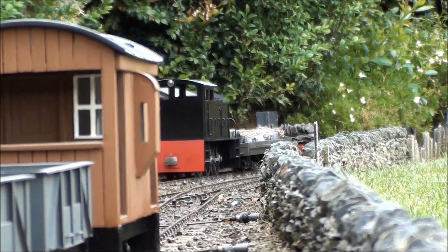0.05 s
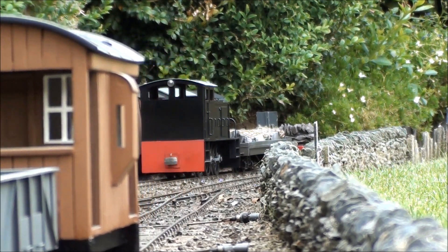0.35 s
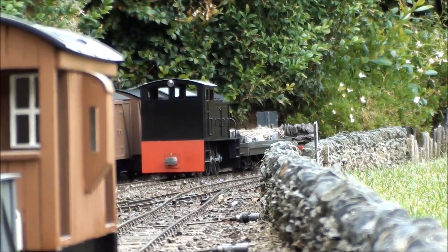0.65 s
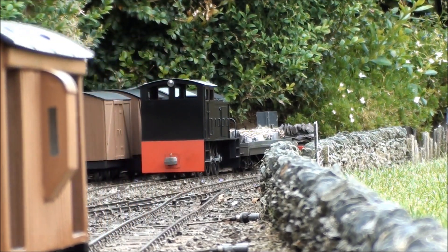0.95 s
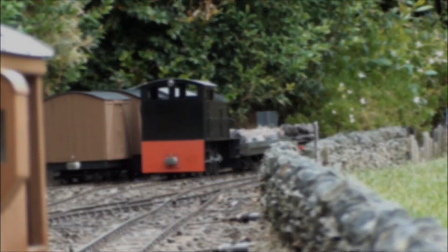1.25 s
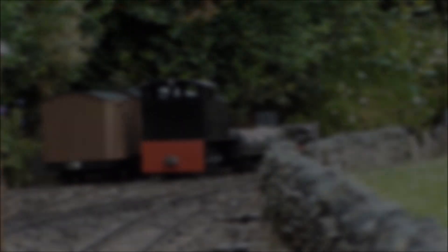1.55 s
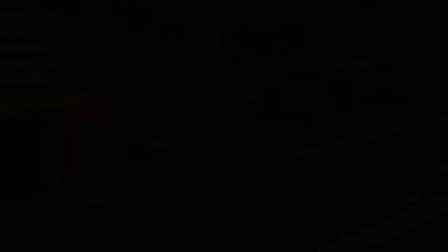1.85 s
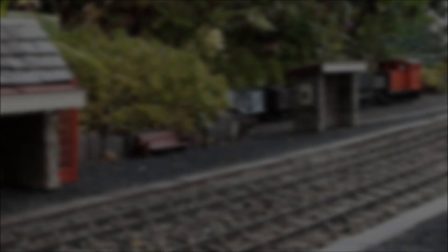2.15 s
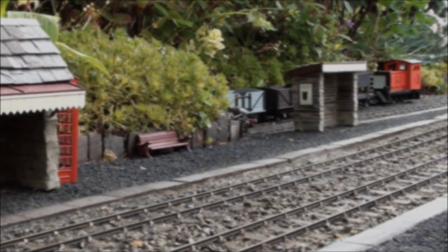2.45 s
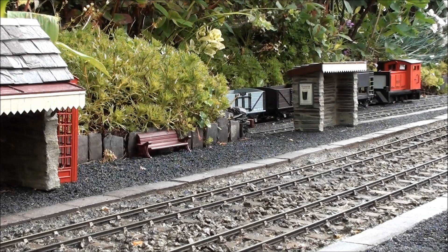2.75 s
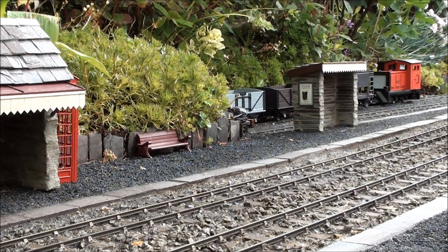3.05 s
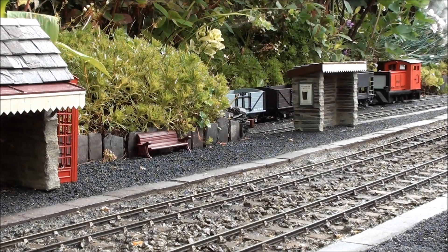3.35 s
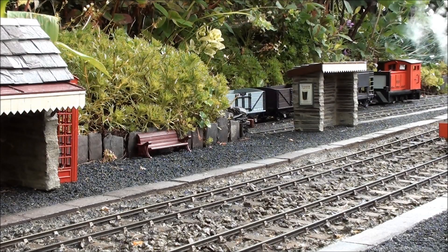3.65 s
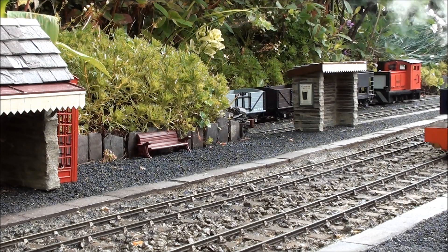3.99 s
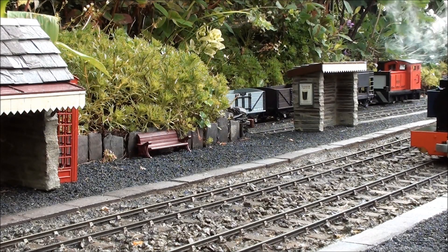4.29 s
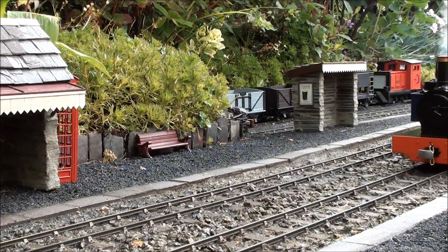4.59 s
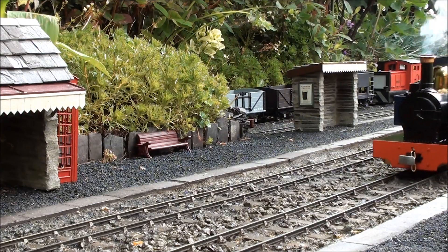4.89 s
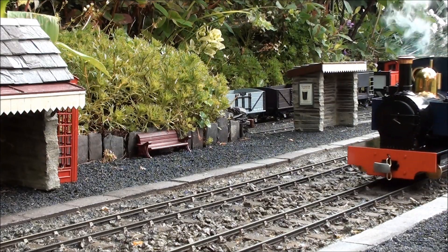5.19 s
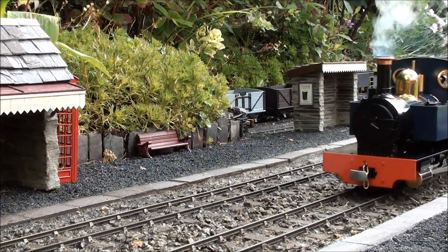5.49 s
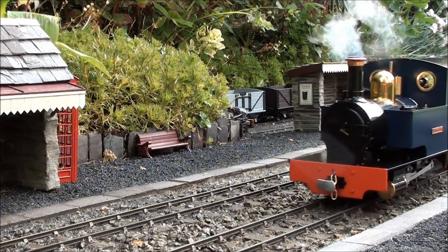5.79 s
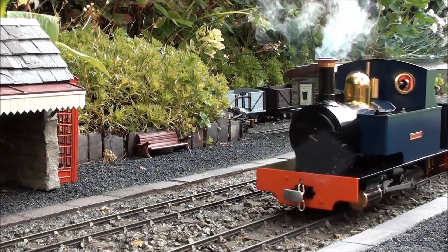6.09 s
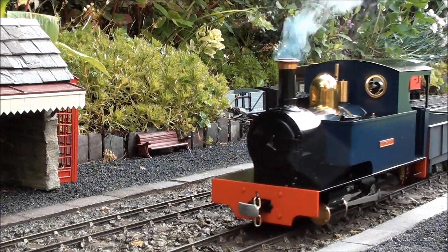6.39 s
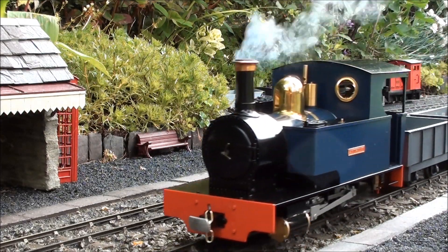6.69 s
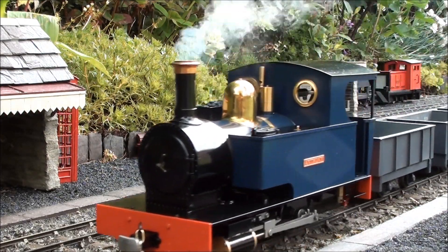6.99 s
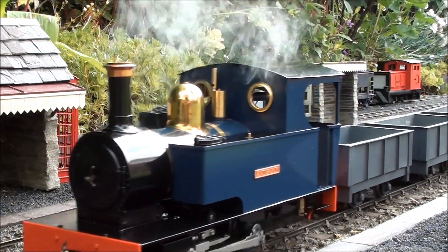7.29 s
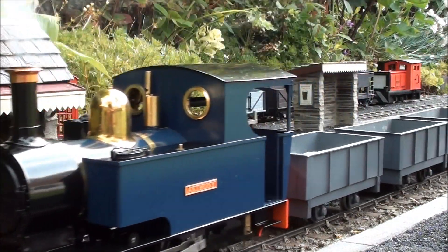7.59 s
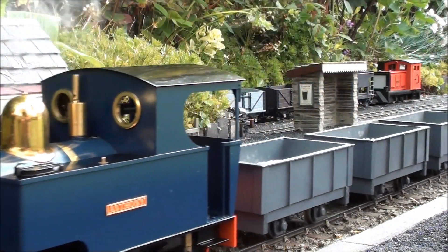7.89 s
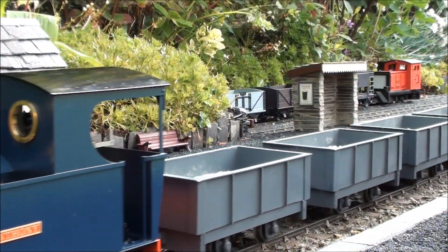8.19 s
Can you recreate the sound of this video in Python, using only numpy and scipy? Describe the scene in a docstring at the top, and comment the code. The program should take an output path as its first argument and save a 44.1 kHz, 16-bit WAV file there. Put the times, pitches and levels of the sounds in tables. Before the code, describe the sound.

From the start, model wagons roll over the points of a garden railway with light, irregular metallic clicks and a gritty rattle. The clicks thin out after about 2 seconds and the rolling is gone before 3. At around 1.8 seconds a small steam locomotive comes in faintly, with bright, hissing chuffs at about five a second. They quicken to nearly nine a second by 5 seconds and grow steadily louder as it approaches. Beneath them swell a thin steam hiss, a low wheel rumble and the hollow roar of the burner. Water spits sharply from the chimney near 4.8 and 6.7 seconds, then in a quick cluster between 7 and 7.3, where the chuffs briefly choke. The engine is closest and loudest from about 6.5 seconds, still chuffing rapidly at the end, just after 8, its hiss dropping slightly in pitch. The outdoor background is very quiet.

```python
"""A garden railway

Model wagons clatter over points and fade away; then a small live steam locomotive gathers speed,
comes close and passes. Each exhaust beat is a pulse of turbulent jet noise that rings in the chimney
and reflects off the ground. Drops of water spit from the chimney, while the rumbling wheels and the
burner, resonating in its flue, make a steady hollow roar."""
import sys
import numpy as np
from scipy import signal
from scipy.fft import rfft, irfft, next_fast_len
from scipy.io import wavfile
from scipy.ndimage import uniform_filter1d, map_coordinates

SR = 44100
rng = np.random.default_rng(int(sys.argv[2]) if len(sys.argv) > 2 else 0)


def transcribe(signal):
    """Save signal, clipped to [-1, 1], as a 16-bit WAV file at the path in sys.argv[1]."""
    frames = np.atleast_2d(signal).T
    limited = np.clip(frames, -1, 1)
    pcm = np.round(limited * 32767).astype(np.int16)
    wavfile.write(sys.argv[1], SR, pcm)


N = 363384
TIME = np.arange(N) / SR

# pipe resonances of the chimney: centre_hz, width_hz, lift_db
CHIMNEY_MODES = [(2970, 140, 3), (3470, 350, -1.5), (4140, 290, 12), (6970, 1170, 7.5), (8930, 560, -2.5),
                 (9550, 350, 2), (10370, 560, 6), (12530, 600, 4.5), (13800, 800, 2)]
# relative level of the wagons as they roll away: time_s, level_db
WAGON_FADE = [(0, -44.5), (.65, -45), (1.35, -50.5), (1.75, -51), (2.4, -60), (2.8, -108)]
# relative levels of the engine as it nears: time_s, exhaust_db, burner_db
ENGINE_APPROACH = [(1.3, -60, -76), (1.8, -42.5, -58), (2.2, -40.5, -49.5), (3.1, -36, -43),
                   (3.9, -30, -40), (4.6, -26.5, -35.5), (5.0, -27.5, -38), (5.55, -23.5, -33.5),
                   (5.9, -20, -33.5), (6.4, -17.5, -30), (6.85, -18.5, -30.5), (7.1, -15.5, -30),
                   (8.24, -16.5, -30.5)]


def from_db(db):
    """Amplitude ratio of a level in decibels."""
    return 10 ** (np.asarray(db) / 20)


def unit_rms(x):
    """Normalisation to a mean power of one."""
    return x / np.sqrt(np.mean(x ** 2) + 1e-20)


def in_time(rows):
    """Linear interpolation of each column of a curve at every sample."""
    times, *columns = np.transpose(rows)
    return [np.interp(TIME, times, column) for column in columns]


def noise():
    """White Gaussian noise."""
    return rng.standard_normal(N)


def drift(rate_hz):
    """Slow random fluctuation with a spread of about one."""
    return np.interp(TIME * rate_hz, np.arange(N), noise())


def colour(x, spectrum, peaks=(), size=4096):
    """Minimum-phase filter: a spectrum (frequency_hz, level_db) with bell-shaped resonances on top."""
    hz = np.fft.rfftfreq(size, 1 / SR) + 1
    points = np.array(spectrum)
    db = np.interp(np.log(hz), np.log(points[:, 0]), points[:, 1])
    for centre, width, lift in peaks:
        db = db + lift / (1 + (2 * (hz - centre) / width) ** 2)
    cepstrum = irfft(np.log(from_db(db)))[:size // 2]
    cepstrum[1:] *= 2
    return signal.fftconvolve(x, irfft(np.exp(rfft(cepstrum, size))))[:N]


def noise_band(count, low_hz, high_hz):
    """Band-limited noise of unit power."""
    bandpass = signal.butter(2, [low_hz, min(high_hz, SR * .45)], "band", fs=SR, output="sos")
    return unit_rms(signal.sosfilt(bandpass, rng.standard_normal(count)))


def above(x, hz):
    """Zero-phase high-pass filter."""
    return signal.sosfiltfilt(signal.butter(6, hz, "high", fs=SR, output="sos"), x)


def glide(x, ratio):
    """Resampling scales every frequency by a changing ratio."""
    return map_coordinates(x, [np.cumsum(ratio)], order=3, mode="wrap")


def burst(start, rise, decay):
    """Smooth attack and exponential decay: the samples covered and the envelope there."""
    at = np.arange(max(int(start * SR), 0), min(int((start + rise + 10 * decay) * SR), N))
    age = TIME[at] - start
    attack = np.sin(np.pi / 2 * np.clip(age / rise, 0, 1)) ** 2
    return at, attack * np.exp(-np.maximum(age - rise, 0) / decay)


def ground_echo(x, longest_s=.0025, growth=0.427, share=0.11):
    """Comb filtering by a reflection off the track bed, whose extra path grows as the engine nears."""
    near_db = in_time(ENGINE_APPROACH)[0]
    delay = longest_s * from_db(growth * (near_db - near_db.max()))
    reflection = map_coordinates(x, [(TIME - delay) * SR], order=3)
    return (x + share * reflection) / np.sqrt(1 + share ** 2)


def passing_echoes(x, echo_db=-17.5, shortest_s=.002, longest_s=.009, slide=0.000505, count=5):
    """Early reflections off walls and wagons, whose paths slide as the engine moves."""
    out = x.copy()
    for mean_delay, slope in rng.uniform([shortest_s, -slide], [longest_s, slide], (count, 2)):
        delay = np.abs(mean_delay + slope * (TIME - TIME.mean()))
        out += from_db(echo_db) * np.interp(TIME - delay, TIME, x)
    return out


def scattered(x, decay_s=0.014, size=4096):
    """Diffuse reflection off walls, stones and shrubs: convolution with decaying noise."""
    tail = rng.standard_normal(size) * np.exp(-TIME[:size] / decay_s)
    return signal.fftconvolve(x, tail / np.linalg.norm(tail))[:N]


def stereo_side(x, side_db=-4.5):
    """Two pickup points differ in phase and in the scattered sound that reaches them."""
    # relative stereo width: frequency_hz, side_to_mid_db
    width = [(30, -54), (125, -17.5), (500, -8), (1000, -8.5), (3000, -15), (8000, -11), (12000, -36)]
    size = next_fast_len(N, real=True)
    hz, db = np.transpose(width)
    weight = from_db(side_db + np.interp(np.log(np.fft.rfftfreq(size, 1 / SR) + 1), np.log(hz), db))
    return irfft(weight * (1j * rfft(x, size) + rfft(scattered(x), size)), size)[:N]


def garden_air(level_db=-60.0):
    """Ambient noise: a low murmur of outdoor air."""
    spectrum = [(20, -22), (50, 4), (120, 1.5), (400, -14.0), (3000, -26), (15000, -41)]
    return from_db(level_db) * unit_rms(colour(noise(), spectrum))


def bumps(gain_db=7.5):
    """Enveloped bands of noise, heard as dull knocks and low swells."""
    # knocks and swells: start_s, level_db, pitch_hz, length_s
    events = [(.27, -56, 1340, 0.055), (.55, -55, 1340, 0.04), (.95, -49.5, 1010, 0.019),
              (2.21, -51.5, 135, 0.09), (2.852, -44, 1310, 0.022), (3.17, -50.5, 85, 0.11),
              (3.746, -57.5, 80, 0.98), (7.174, -34, 630, 0.038), (7.246, -37, 261, 0.021)]
    out = np.zeros(N)
    for start, db, hz, length in events:
        at, shape = burst(start, length / 2, length / 2)
        out[at] += from_db(db + gain_db) * shape * noise_band(len(at), hz / 2.07, hz * 1.3)
    return out


def knocks(rebound_s=.0105, jostles_per_s=20, jostle_db=13.5, spread_db=2.5, jostle_hz=(1340, 5990)):
    """Impacts as wheels rebound twice and couplings jostle at random: start_s, level_db, pitch_hz."""
    # wheels striking the points: start_s, level_db, pitch_hz, change_per_rebound_db
    strikes = [(0.025, -29, 2760, -14), (0.0722, -23, 4250, -5), (0.1535, -31, 5200, -6),
               (0.2688, -32, 1250, 0.5), (0.3626, -28, 7240, -16), (0.4943, -26, 5600, -7),
               (0.5516, -26.5, 1320, -6), (0.6103, -29.5, 5430, -18), (0.678, -27, 6900, -9),
               (0.7132, -26.5, 6380, -2), (0.7522, -30.5, 5220, -5), (0.8767, -27.5, 2530, -0.5),
               (0.9537, -25.5, 3010, -13), (1.0833, -24, 3670, 0.5), (1.1534, -27, 2800, -14),
               (1.178, -25.5, 5460, -9.5), (1.287, -25, 2424, 0), (1.3844, -28, 3590, -9),
               (1.4396, -21.5, 2710, -15), (1.492, -22.5, 3290, -6.5), (1.5853, -27.5, 1560, -6),
               (1.62, -31, 3980, -8), (1.696, -22, 3610, -10), (1.83, -24, 2810, -14),
               (1.9051, -26.5, 5390, -11)]
    rows = [(start + k * rebound_s, db + k * change_db, hz)
            for start, db, hz, change_db in strikes for k in range(3)]
    rolling_db = in_time(WAGON_FADE)[0]
    jostles = rng.random((int(jostles_per_s * WAGON_FADE[-1][0]), 3))
    for k, (when, strength, pitch) in enumerate(jostles):
        start = (k + when) / jostles_per_s
        db = rolling_db[int(start * SR)] + jostle_db + spread_db * (2 * strength - 1)
        rows.append((start, db, np.interp(pitch, [0, 1], jostle_hz)))
    return rows


def wagons(clack_db=-10, ring_db=-12, rattle_db=-4.5):
    """Rolling noise with a gritty rattle; each impact excites a clack and three damped metal modes."""
    # spectrum of an impact: frequency_hz, level_db
    clack_spectrum = [(200, -9), (900, -0.5), (2000, 3), (3000, 4.5), (5700, 6), (7500, -4), (10000, -9),
                      (15500, -38)]
    # resonances of the wagons: centre_hz, width_hz, lift_db
    wagon_modes = [(1296, 290, 14.5), (2820, 350, 8), (4100, 350, 12.5), (7420, 2200, 18.5),
                   (10200, 700, 9)]
    # spectrum of small wheels rolling: frequency_hz, level_db
    rolling_spectrum = [(25, -17), (53, -1), (90, -7), (140, 0), (225, 9), (330, 3), (450, 1), (620, -1.5),
                        (770, 4.5), (950, -1.5), (1300, 0), (2300, -5), (5400, -5.5), (15800, -19.5)]
    clacks = np.zeros(N)
    clack_noise = unit_rms(colour(noise(), clack_spectrum))
    for start, db, hz in knocks():
        at, shape = burst(start, rise=0.00089, decay=0.0054)
        clacks[at] += from_db(db + clack_db) * shape * clack_noise[at]
        at, shape = burst(start, rise=0.00072, decay=0.0065)
        partials = hz * np.array([1, rng.uniform(0.39, 0.8), rng.uniform(1.1, 1.4)])
        ring = np.array([1, .6, .5]) @ np.sin(2 * np.pi * np.outer(partials, TIME[at] - start))
        clacks[at] += from_db(db + ring_db) * shape * ring
    grit = noise() * from_db(6.7 * drift(130))
    rattle = unit_rms(colour(grit, clack_spectrum, wagon_modes))
    rolling = unit_rms(colour(noise(), rolling_spectrum))
    return clacks + from_db(in_time(WAGON_FADE)[0] - 0.5) * (rolling + from_db(rattle_db) * rattle)


def wheel_rumble(gain_db=-6.5, follow=0.99):
    """Rolling noise of the engine's wheels on the rails, swelling as it nears."""
    # spectrum of the rumble: frequency_hz, level_db
    spectrum = [(30, -11.5), (70, -8.5), (130, -4), (170, -1.5), (225, 3.5), (270, -4.5), (315, 1),
                (370, 0), (440, -3), (550, -11), (900, -18.5), (3000, -35.5)]
    near_db = in_time(ENGINE_APPROACH)[1]
    level_db = near_db.max() + gain_db + follow * (near_db - near_db.max())
    return from_db(level_db) * unit_rms(colour(noise(), spectrum))


def flue_resonance(far_hz, near_hz, far_db, halfway_db, near_db, width_hz=112):
    """Turbulence excites one resonance of the flue, which shifts as the engine draws level."""
    hz = np.interp(TIME, (5.2, 7.3), [far_hz, near_hz])
    db = np.interp(TIME, (3.45, 4.06, 6), [far_db, halfway_db, near_db])
    lowpass = signal.butter(2, width_hz / 2, fs=SR, output="sos")
    envelope = signal.sosfilt(lowpass, noise() + 1j * noise())
    return from_db(db) * unit_rms(np.real(envelope * np.exp(2j * np.pi * np.cumsum(hz) / SR)))


def burner(rush_db=-8.5, hollow_db=-2.5):
    """Combustion noise: the gas flame's broadband rush and the hollow resonances of its flue."""
    # spectrum of the flame: frequency_hz, level_db
    spectrum = [(450, -21.5), (640, -1.5), (790, 5), (1000, -4), (1400, -6.5), (1900, -7.5), (2300, -13),
                (5000, -9.5), (15000, -26)]
    # resonances of the flue: far_hz, near_hz, far_db, halfway_db, near_db
    flue_modes = [(860.5, 785, -4, -10.5, -10), (1090, 975, -17, -24, -3.5), (1326, 1335, -7.5, -11.5, -7),
                  (1769, 1560, -37, -35, -11)]
    flue = sum(flue_resonance(*mode) for mode in flue_modes)
    roar = from_db(rush_db) * unit_rms(colour(noise(), spectrum)) + from_db(hollow_db) * flue
    return from_db(in_time(ENGINE_APPROACH)[1] + drift(60)) * roar


def steam_leak(gain_db=-9.0):
    """Jet noise of steam leaking steadily past the glands fills the gaps between beats."""
    # spectrum of the leak: frequency_hz, level_db
    spectrum = [(1500, -24), (2600, -9), (3000, 8), (3700, 1), (4120, 2.5), (5300, -8), (7000, -2),
                (10300, -5), (11200, -9.5), (15800, -10)]
    hiss = unit_rms(colour(noise(), spectrum, CHIMNEY_MODES))
    return from_db(in_time(ENGINE_APPROACH)[1] + gain_db) * hiss


def water_spits(gain_db=-7.0, band_ratio=1.46):
    """Impulsive excitation: drops of condensate burst at the chimney top and ring its modes."""
    # bursting drops: start_s, level_db, pitch_hz
    drops = [(2.5963, -23.5, 6000), (4.792, -10, 6960), (6.3833, -16, 3200), (6.7412, -6.5, 6040),
             (7.0646, -12, 7030), (7.185, -22, 6000), (7.229, -8, 8000), (7.2756, -14, 7040),
             (7.3128, 2, 9700)]
    snaps = np.zeros(N)
    for start, db, hz in drops:
        at, shape = burst(start, rise=0.0013, decay=0.0015)
        snaps[at] += from_db(db + gain_db) * shape * noise_band(len(at), hz / band_ratio, hz * band_ratio)
    spectrum = [(300, 11), (2300, 8.5), (4200, 0), (5500, 3), (11000, -2.5), (15000, 1.5)]
    return colour(snaps, spectrum, CHIMNEY_MODES)


def steam_jet(bright_db, pressure, passing_s=7.25, sag_per_s=.05, mode_hz=4150, mode_width_hz=220):
    """Wet jet noise filtered by the chimney; its resonances sink in pitch as the engine goes by."""
    # spectrum of the jet: frequency_hz, level_db
    spectrum = [(300, -35.5), (900, -15), (1650, -18), (2150, -25), (2550, -22), (2800, -6.5), (3500, -8.5),
                (4400, -8.5), (5000, -19), (5800, -16.5), (6700, -8.5), (10300, -12), (11000, -22),
                (15800, -25)]
    # directivity, the colour as the angle changes: time_s, pipe_mode_db, treble_db, top_db
    directivity = [(1.8, -1, -8.5, 0), (2.8, 0.5, 3, 0), (3.6, -2.5, 1.5, 1), (4.3, 4.5, 1.7, 0.5),
                   (5.3, 3.5, 5, -2), (6.1, 0, 1.3, -1.5), (7.1, -4, 0.5, 2.5), (7.5, -1, 0, -1),
                   (8.24, 4.5, -1, -7.5)]
    mode_db, treble_db, top_db = in_time(directivity)
    treble_db += bright_db
    droplets = (rng.random(N) < 500 / SR) * noise() * from_db(2 * noise())   # about 500 a second
    jet = unit_rms(colour(noise() + from_db(-8) * unit_rms(droplets), spectrum, CHIMNEY_MODES))
    treble, top = above(jet, 6140), above(jet, 10330)
    # the strongest pipe mode stands out of the hiss more at some angles than at others
    mode = signal.lfilter(*signal.iirpeak(mode_hz, mode_hz / mode_width_hz, fs=SR), jet)
    body = (jet - treble + (from_db(mode_db) - 1) * mode) * from_db(-0.44 * mode_db)
    pitch = 1 - sag_per_s * np.maximum(TIME - passing_s, 0)
    blast = .01 * (pressure - pressure.mean())   # the chimney rings higher under pressure
    return (glide(body, pitch + blast)
            + from_db(treble_db) * glide(treble - top, pitch ** 1.5)   # the treble sinks further
            + from_db(treble_db / 2 + top_db) * top)


def beats(choke_s=7.23, clearing_s=0.2, choke_db=-6):
    """Valve timing, four openings in each turn of the wheels: the start and level of every beat."""
    # the engine labours, then gathers speed: time_s, beats_per_s
    speed = [(1.77, 5.812), (1.949, 4.531), (3.073, 5.629), (4.749, 8.722), (5.425, 8.637), (8.24, 9.394)]
    # the four openings of one turn: lead_beats, accent_db
    valve_events = [(0, .5), (0.034, -0.5), (.04, -0.2), (.058, -0.47)]
    strokes = np.cumsum(in_time(speed)[0]) / SR
    strokes -= np.interp(speed[0][0], TIME, strokes)
    number = np.arange(int(strokes[-1]) + 1)
    early, accent_db = np.array(valve_events)[number % len(valve_events)].T
    starts = np.interp(number - early, strokes, TIME)
    # a slug of water stifles the beats until it is blown clear
    choked = (starts > choke_s) * np.exp(-np.abs(starts - choke_s) / clearing_s)
    return starts, np.interp(starts, TIME, in_time(ENGINE_APPROACH)[0]) + accent_db + choke_db * choked


def exhaust(lead_s=0.0066, crack_share=0.12, gain_db=2.0, flutter_db=1.5):
    """Pulsed flow modulates the jet: a crack as the valve opens, then the cylinder empties."""
    flow, cracks, pressure = np.zeros((3, N))
    starts, levels = beats()
    ends = np.append(starts[1:], 2 * starts[-1])
    for start, db, stroke_s, end in zip(starts, levels, np.gradient(starts), ends):
        at, crack = burst(start - lead_s, rise=0.026, decay=0.02)
        flow[at] += from_db(db) * crack_share * crack
        cracks[at] += crack
        # the faster the wheels turn, the more abruptly the valve opens
        at, emptying = burst(start - lead_s, rise=0.0075 + 0.058 * stroke_s, decay=0.58 * stroke_s)
        valve = np.clip((end + 0.0036 - TIME[at]) / 0.0084, 0, 1)   # shuts as the next beat begins
        flow[at] += from_db(db) * (1 - crack_share) * emptying * valve
        pressure[at] += emptying * valve
    bright_db = 1.5 * cracks - 3.5   # the jet is brightest during each crack
    return steam_jet(bright_db, pressure) * flow * from_db(gain_db + flutter_db * drift(160))


def scene():
    """Superposition of engine, wagons and garden, spread in stereo by level and phase differences."""
    # stereo balance: time_s, left_minus_right_db
    pan = [(1.6, 3.5), (2.2, 0.7), (5, -0.3), (7.3, 0), (8.24, 2.6)]
    steam = ground_echo(exhaust() + steam_leak()) + water_spits()
    engine = passing_echoes(steam) + wheel_rumble() + burner()
    mid = engine + wagons() + bumps() + garden_air()
    left_right = np.array([[1], [-1]])
    return mid * from_db(left_right * in_time(pan)[0] / 2) + left_right * stereo_side(mid)


def gain_control(x, threshold_db=-11.5, window_s=0.0031, recovery_db_per_s=5.5):
    """Limiting: a loud crack pulls the gain down at once, and it climbs back slowly."""
    power = uniform_filter1d(np.mean(x ** 2, axis=0), int(window_s * SR))
    over_db = np.maximum(10 * np.log10(np.abs(power) + 1e-12) - threshold_db, 0)
    recovery_db = recovery_db_per_s * TIME
    return x * from_db(recovery_db - np.maximum.accumulate(over_db + recovery_db))


def record(dry):
    """Limiting, soft saturation of the highest peaks and a steep low-pass filter."""
    lowpass = signal.ellip(12, .1, 80, 15750, fs=SR, output="sos")
    return signal.sosfilt(lowpass, np.tanh(gain_control(dry)))


dry = scene()
out = record(dry)
transcribe(out)
```